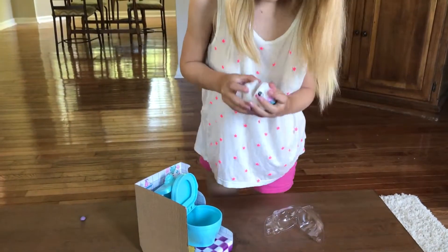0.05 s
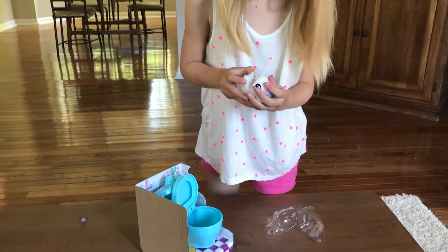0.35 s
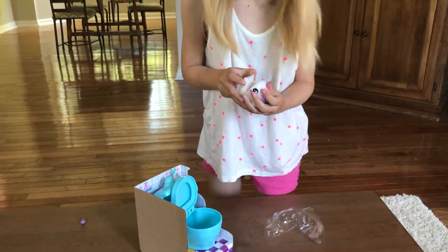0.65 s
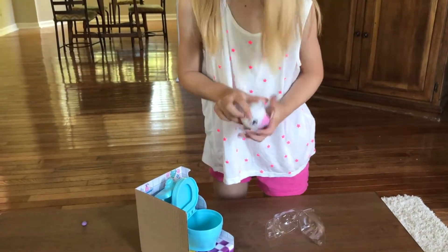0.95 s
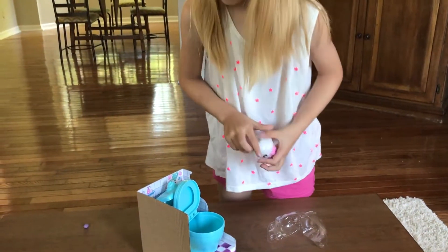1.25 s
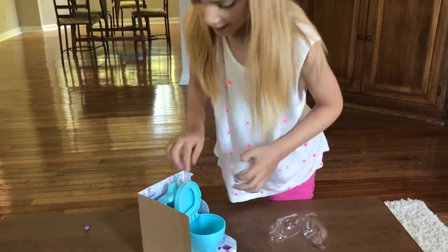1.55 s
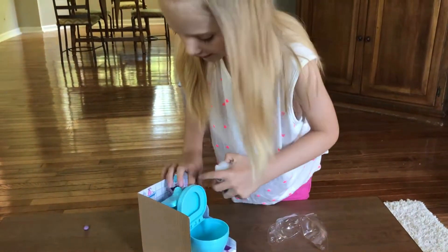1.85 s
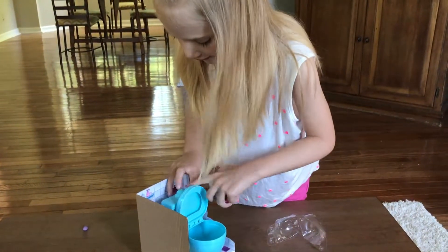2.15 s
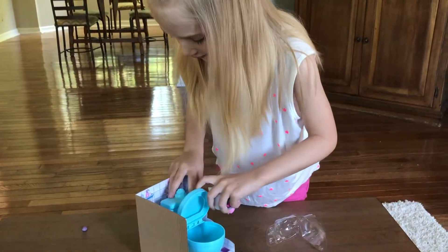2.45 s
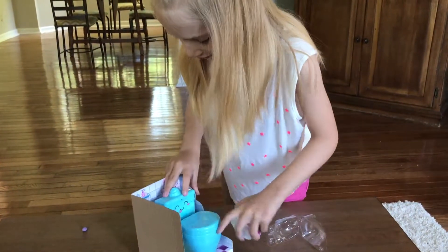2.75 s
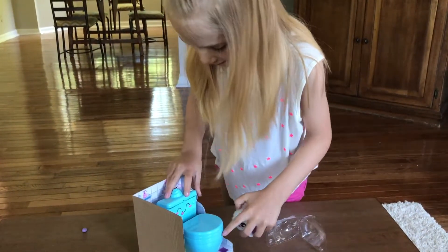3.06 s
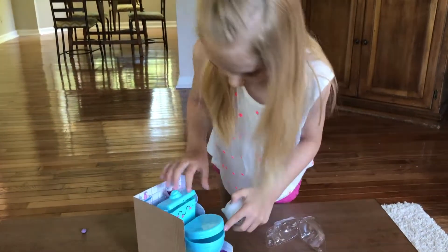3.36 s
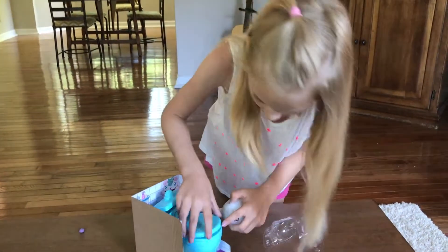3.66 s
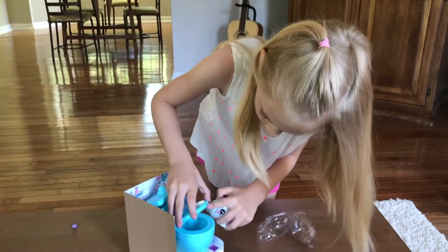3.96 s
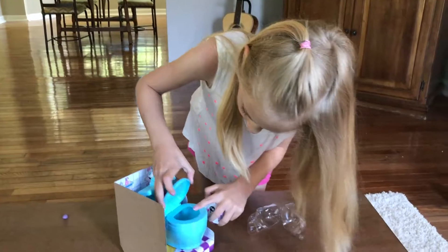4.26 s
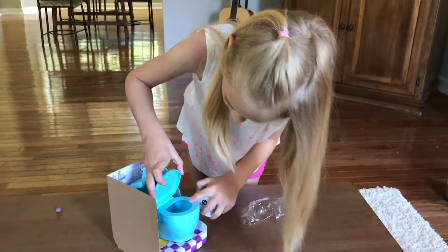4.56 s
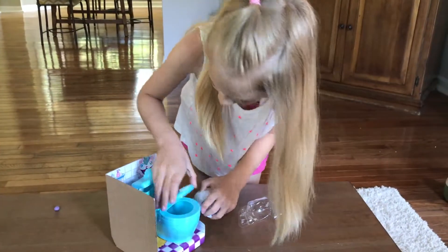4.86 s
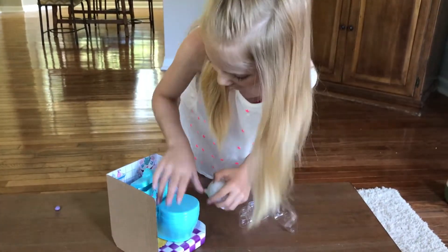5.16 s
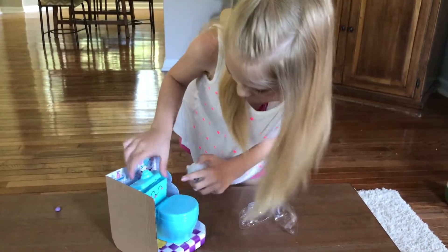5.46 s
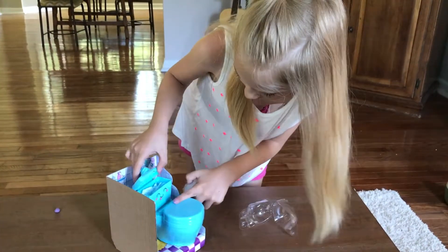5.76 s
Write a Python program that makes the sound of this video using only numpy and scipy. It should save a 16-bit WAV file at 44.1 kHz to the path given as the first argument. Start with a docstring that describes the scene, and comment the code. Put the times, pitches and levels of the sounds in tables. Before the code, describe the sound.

A small plastic toy with a hinged lid is handled on a table near the microphone. Light rubbing and taps lead to two sharp plastic clacks about a second apart, the first the loudest. The hinge creaks faintly, then the lid is pressed down with a hollow knock, followed by smaller taps and soft cardboard thumps. The room rings briefly after each hit, over still air and a low appliance hum.

```python
"""Plastic toy in its box

A quiet, wood-floored room, one microphone near a table. On it a hollow plastic toy with a hinged lid and
seat stands in its cardboard box. Fingers rub and bump it; the lid rattles and slaps shut, the seat drops,
the hinge creaks, and the lid is pressed home with a knock through bowl and box. Each blow cracks in the
thin walls and rings the part it hits; the room answers briefly, over still air and a faint hum."""
import sys
import numpy as np
from scipy import signal
from scipy.fft import rfft, irfft, next_fast_len
from scipy.io import wavfile
from scipy.ndimage import map_coordinates

SR = 44100
rng = np.random.default_rng(int(sys.argv[2]) if len(sys.argv) > 2 else 0)


def wrap_up_sound(samples):
    """Save the sound to the file named by the first command line argument, as 16-bit audio."""
    columns = np.atleast_2d(samples).T
    # keep every value between -1 and 1, then stretch to whole-number steps
    tamed = np.clip(columns, -1, 1)
    steps = np.round(tamed * 32767).astype(np.int16)
    wavfile.write(sys.argv[1], SR, steps)


N = 261072
BLOW_SAMPLES = 8192
T, HZ = np.arange(BLOW_SAMPLES) / SR, np.fft.rfftfreq(BLOW_SAMPLES, 1 / SR)  # axes of one blow

# Slow decay of the room: frequency_hz, t60_s
ROOM_DECAY = [(150, 1.35), (400, .5), (1000, 0.78), (3000, 0.61), (8000, 0.72), (15000, .5)]
# Colour of the room's answer: frequency_hz, gain_db
ROOM_COLOUR = [(120, -8), (300, 0.5), (520, -2.5), (1000, -1), (2500, -5.5), (4500, -8.5), (6500, -11.5),
               (9000, -10.5), (15000, -18.5)]
# Still air in the house: frequency_hz, relative_db
AIR_SPECTRUM = [(15, -37), (25, -13), (53, 5), (80, -9), (114, -3.5), (134, -7), (149, -25), (175, -7),
                (242, -17.5), (263, -13), (373, -16), (575, -23), (911, -24), (1370, -31), (16000, -45)]
# Household appliances: pitch_hz, level_db
HUM_TONES = [(51, -78.5), (120, -77), (239, -77), (905, -88)]
# The box pushed against the table: start_s, pitch_hz, peak_db
BOX_PUSHES = [(1.918, 264, -51.5), (2.022, 253, -55.5), (2.093, 230, -47.5), (4.778, 160, -47.5),
              (5.166, 150.5, -45.5), (5.513, 146, -53), (5.698, 310, -48)]
# Fingers on plastic and cardboard: middle_s, length_s, strength_db
FINGER_STROKES = [(1.04, 0.09, -80), (1.472, 0.11, -74), (1.867, 0.079, -63.5), (2.043, 0.073, -69),
                  (2.154, 0.1, -74), (2.264, .05, -66), (2.706, .056, -58.5), (3.103, 0.14, -70),
                  (3.303, 0.045, -67.5), (3.679, 0.033, -64.5), (4.06, 0.2, -69), (5.04, .043, -72),
                  (5.593, 0.2, -71), (5.907, 0.13, -68)]
# The low scrape and high hiss of rubbing: frequency_hz, relative_db
SCRAPE_SPECTRUM = [(150, -25.5), (500, -2.5), (1000, 2), (1700, -2), (2300, -5), (2900, -7.5), (3700, -8),
                   (4800, -20.5), (9000, -57.5)]
HISS_SPECTRUM = [(800, -48), (2200, -3), (3300, -7), (5500, 1), (8000, -5), (15500, -5.5)]
# A dragging fingertip makes the bowl sing: middle_s, length_s, pitch_hz, level_db
FINGER_SQUEAKS = [(1.868, 0.047, 1040, -66.5), (1.869, 0.024, 678, -66.5), (5.607, 0.046, 1038, -62),
                  (5.907, 0.031, 1040, -63.5)]
# Dense, quickly damped vibration of the thin walls: frequency_hz, relative_db
WALL_SPECTRUM = [(80, -38.5), (185, -21.5), (260, -2), (400, -3.5), (520, -8.5), (720, -4.5), (1020, 2),
                 (1580, -4), (2000, -4.5), (3900, -1), (4700, -5), (6200, -3), (10500, -5), (14000, 0)]
# Resonances of each part: pitch_hz, width_hz, relative_db
LID_MODES = [(291, 15, 2), (400, 56, 0), (722, 70, -8.5), (985, 34, -0.5), (1866, 32, -3), (1934, 23, 1),
             (2220, 30, -2.5), (2770, 130, -1.5), (3660, 110, -2.5), (3900, 62, -2.5), (5340, 26, -6),
             (5766, 50, -4.5), (6200, 91, -3.5), (6820, 44, -4), (8460, 34, -4.5), (8760, 120, -7.5),
             (9600, 60, -3), (13450, 140, -3.5)]
SEAT_MODES = [(686.5, 84, 1), (900, 73, 1), (1263, 59, 2.5), (1980, 43.15, -7.5), (2247, 41, 0.5),
              (2760, 37, 5), (3260, 33, 3), (4340, 43, -4.5), (4530, 210, 2), (5640, 110, -8),
              (5880, 130, -0.5), (7200, 79, -7), (8520, 70, 1.5), (9200, 110, 5), (13600, 80, 0.5)]
BOWL_MODES = [(296, 45, -1), (389.6, 120, -0.5), (686, 180, -2.5), (990.6, 80, -2.5), (1370, 68, -2.5),
              (1790, 40, -5.5), (2283, 30, -4), (2717, 49, -2.5), (3570, 37, -48), (4620, 64, -14),
              (6360, 190, -3), (8600, 300, -3.5)]
# Contacts with each part: start_s, panel_hz, level_db, hardness_hz, weight_db
# Treble falls above the hardness: low for a fingertip, high for plastic on plastic.
# Weight is the bass: little in a loose rattle, much in a push that reaches the table.
LID_CONTACTS = [(2.677, 850, -53, 2905, -19.5), (2.6897, 716, -44, 2600, -15),
                (2.7195, 780, -47, 4000, -18), (2.729, 2936, -41, 3000, -18.5),
                (2.7418, 270, -16, 21990, -6)]
SEAT_CONTACTS = [(3.3965, 2310, -63, 2770, 6), (3.633, 2150, -58, 2000, 10), (3.6612, 895, -52.5, 3380, 12),
                 (3.7048, 2180, -45, 2900, -22), (3.7113, 704, -25, 15000, -7),
                 (4.2535, 1402, -54.5, 2610, -13), (4.768, 2240, -52, 2860, 8.5),
                 (4.859, 1410, -61.5, 2000, -9), (4.8865, 3530, -64, 7000, -10),
                 (4.974, 1570, -57, 2900, -24)]
BOWL_CONTACTS = [(.7905, 2120, -69.5, 14000, 7), (1.727, 1370, -67.5, 4800, -13),
                 (1.8305, 3650, -54.5, 3400, -27), (1.9105, 2270, -49, 2370, -12),
                 (2.0932, 678, -48, 1733, -13), (2.141, 845, -64.5, 5400, -11),
                 (5.081, 1465, -54.5, 3000, -19), (5.085, 1464, -36, 12000, 6),
                 (5.1585, 1020, -47, 1100, -4.5), (5.2283, 1890, -44, 5940, 2),
                 (5.3232, 2400, -56.5, 3620, -7), (5.5955, 1430, -53, 2445, 4.5),
                 (5.6065, 910, -53.5, 7800, -9), (5.624, 2630, -62, 2840, -20), (5.657, 1380, -60, 3500, 0),
                 (5.6985, 1357, -49.5, 6000, 3.5)]


def amp(db):
    """Decibels to gain."""
    return 10 ** (np.asarray(db) / 20)


def unit(x):
    """x at rms 1."""
    return x / np.sqrt(np.mean(x ** 2) + 1e-30)


def along(points, hz):
    """A curve read on a log frequency axis."""
    frequencies, values = np.transpose(points)
    return np.interp(np.log(hz + 1), np.log(frequencies + 1), values)


def filtered(x, gain):
    """x times a gain that depends on frequency."""
    size = next_fast_len(N + BLOW_SAMPLES)
    return irfft(rfft(x, size) * gain(np.fft.rfftfreq(size, 1 / SR)), size)[:N]


def coloured(x, spectrum):
    """x shaped by a spectrum table, at rms 1."""
    return unit(filtered(x, lambda hz: amp(along(spectrum, hz))))


def causal(db):
    """The response with these gains that never sounds before its cause."""
    cepstrum, half = irfft(np.log(amp(db))), BLOW_SAMPLES // 2
    return np.exp(rfft(cepstrum * np.r_[1, np.full(half - 1, 2), np.zeros(half)]))


def smoothed(power, spread):
    """Mean of a power spectrum over a share of each frequency to either side."""
    total, reach = np.cumsum(power), spread * HZ + 2 * HZ[1]
    return (np.interp(HZ + reach, HZ, total) - np.interp(HZ - reach, HZ, total)) * HZ[1] / (2 * reach)


def add(track, start_s, x):
    """Mix x into the track."""
    part = track[max(round(start_s * SR), 0):][:len(x)]
    part += x[:len(part)]


def house(air_db=-64.5, waver_rad=0.98):
    """Room tone: still air and a faint, slightly unsteady appliance hum."""
    t = np.arange(N) / SR
    drift = lambda: map_coordinates(rng.standard_normal(32), [t * 4])
    hum = sum(np.sqrt(2) * amp(db) * np.sin(2 * np.pi * hz * t + waver_rad * drift())
              for hz, db in HUM_TONES)
    return hum + amp(air_db) * coloured(rng.standard_normal(N), AIR_SPECTRUM)


def room(early_t60=0.28, early_db=4, first_wall_s=.009):
    """A click's echoes at the microphone: near walls die fast, the open space behind more slowly."""
    hz, t, noise = signal.stft(rng.standard_normal(int(SR * .7)), SR, nperseg=256)
    decay = amp(-60 * t / along(ROOM_DECAY, hz)[:, None]) + amp(early_db - 60 * t / early_t60)
    decay /= np.sqrt(np.mean(decay ** 2, axis=1, keepdims=True))
    tail = signal.istft(noise * decay * amp(along(ROOM_COLOUR, hz))[:, None], SR, nperseg=256)[1]
    return np.r_[np.zeros(int(first_wall_s * SR)), tail / np.sqrt(len(tail))]


def fingers(catches_per_s=2500, smooth_share=0.65, scrape_db=-1, hiss_db=-5, squeak_width_hz=70):
    """Rubbing is a stream of tiny catches; one swell per stroke drives both its scrape and its hiss."""
    t = np.arange(N) / SR
    catches = unit((rng.random(N) < catches_per_s / SR) * rng.standard_normal(N))
    friction = catches + smooth_share * rng.standard_normal(N)
    swell = lambda middle, length: np.exp(-2 * ((t - middle) / length) ** 2)
    effort = sum(amp(db) * swell(s, length) for s, length, db in FINGER_STROKES)
    resonance = lambda pitch: lambda hz: 1 / (1 + (2 * (hz - pitch) / squeak_width_hz) ** 2)
    squeaks = sum(amp(db) * swell(s, length) * unit(filtered(friction, resonance(hz)))
                  for s, length, hz, db in FINGER_SQUEAKS)
    scrape = amp(scrape_db) * coloured(friction, SCRAPE_SPECTRUM)
    hiss = amp(hiss_db) * coloured(friction, HISS_SPECTRUM)
    rub = effort * (scrape + hiss) + squeaks
    return rub + signal.fftconvolve(rub, room())[:N]


def box(t60=0.044, rise_s=0.0022, wet_db=-2):
    """Each soft push swells into one low, quickly damped note of the cardboard."""
    track = np.zeros(N)
    swell = (1 - np.exp(-(T / rise_s) ** 2)) * amp(-60 * T / t60)
    for start_s, hz, db in BOX_PUSHES:
        add(track, start_s, amp(db) * swell / swell.max() * np.sin(2 * np.pi * hz * T))
    return track + amp(wet_db) * signal.fftconvolve(track, room())[:N]


def touch(hardness_hz, weight_db, fall_db_per_octave=11.5, whole_toy_hz=514):
    """Colour of a contact in dB: a soft one lacks treble, a heavy one moves the whole toy, adding bass."""
    treble = -10 * np.log10(1 + (HZ / hardness_hz) ** (fall_db_per_octave / (10 * np.log10(2))))
    return treble + weight_db / (1 + (HZ / whole_toy_hz) ** 4)


def snap(noise, t60):
    """Spectrum of a dying burst that, like a sharp contact, is even from bass to treble."""
    burst = rfft(noise * amp(-60 * T / t60))
    return burst * causal(-10 * np.log10(smoothed(np.abs(burst) ** 2, spread=.2) + 1e-9))


def blow(modes, panel_hz, colour_db, rise_s, crack_t60, ring_db, panel_db, sheen_db,
         panel_t60=.04, damping_hz=9000):
    """One contact: a crack of the thin walls, the ring of the part and the note of the touched panel."""
    onset = 1 - np.exp(-(T / rise_s) ** 2)
    noise = rng.standard_normal(BLOW_SAMPLES) * onset
    # plastic damps the highest vibrations twice as fast
    high = 1 / (1 + (damping_hz / (HZ + 1)) ** 4)
    burst = (1 - high) * snap(noise, crack_t60) + high * amp(sheen_db) * snap(noise, crack_t60 / 2)
    crack = irfft(burst * causal(along(WALL_SPECTRUM, HZ)))
    ring = np.zeros(BLOW_SAMPLES)
    for hz, width_hz, db in modes:
        scatter_db, phase = rng.standard_normal(2)
        decay = width_hz * np.exp(-np.pi * width_hz * T)
        ring += amp(db + scatter_db) * decay * np.sin(2 * np.pi * (hz * T + phase))
    panel = np.sin(2 * np.pi * panel_hz * T) * amp(-60 * T / panel_t60)
    spectrum = rfft(unit(crack) + amp(ring_db) * unit(ring * onset) + amp(panel_db) * unit(panel * onset))
    knock = unit(irfft(spectrum * causal(colour_db)))
    return knock * np.sqrt(.01 * SR / BLOW_SAMPLES)  # the energy of 10 ms at 0 dB


def radiated(x, even_share):
    """A blow as it leaves the toy in all directions: its peaks and notches partly even out."""
    power = np.abs(rfft(x)) ** 2
    evened = even_share * smoothed(power, spread=.21) + (1 - even_share) * power
    return irfft(causal(10 * np.log10(evened + 1e-14)))


def struck(contacts, modes, attack_s, wet_db, even_share, press_cycles=1.2, **timbre):
    """Blows on one part, each reaching the microphone directly and then by way of the room."""
    track = np.zeros(N)
    for start_s, panel_hz, db, hardness_hz, weight_db in contacts:
        rise_s = attack_s + press_cycles / hardness_hz  # a soft contact builds up more slowly
        direct = amp(db) * blow(modes, panel_hz, touch(hardness_hz, weight_db), rise_s, **timbre)
        add(track, start_s, direct)
        add(track, start_s, amp(wet_db) * signal.fftconvolve(radiated(direct, even_share), room()))
    return track


def loose_parts(start_s=1.75, end_s=4.6, count=10, tick_db=-76, spread_db=2.5,
                hardness_hz=7000, weight_db=-12):
    """Loose parts tick faintly at random moments while the toy is handled."""
    ticks = []
    for when, which, size in rng.random((count, 3)):
        panel_hz = SEAT_MODES[int(which * len(SEAT_MODES))][0]
        db = tick_db + spread_db * (2 * size - 1)
        ticks.append((start_s + (end_s - start_s) * when, panel_hz, db, hardness_hz, weight_db))
    return struck(ticks, SEAT_MODES, attack_s=0.0003, wet_db=-3.5, even_share=0.5,
                  crack_t60=0.017, ring_db=-8.5, panel_db=-13, sheen_db=-0.5)


def hinge(start_s=4.4847, first_gap_s=0.013, shortest_gap_s=0.0061, quicken=0.73, count=8,
          panel_hz=1607, slip_db=-66, hardness_hz=8000, weight_db=-12):
    """The tight hinge sticks and slips, faster and faster as the lid swings."""
    gaps = shortest_gap_s + (first_gap_s - shortest_gap_s) * quicken ** np.arange(count - 1)
    slips = [(s, panel_hz, slip_db, hardness_hz, weight_db) for s in start_s + np.r_[0, np.cumsum(gaps)]]
    return struck(slips, SEAT_MODES, attack_s=0.00027, wet_db=0.5, even_share=0.46,
                  crack_t60=0.022, ring_db=-10, panel_db=-11, sheen_db=-1.5)


def bowl():
    """The hollow bowl knocks as it is bumped and as the lid is pressed home."""
    return struck(BOWL_CONTACTS, BOWL_MODES, attack_s=0.00053, wet_db=-0.5, even_share=0.65,
                  crack_t60=0.035, ring_db=-3.5, panel_db=-6, sheen_db=-0.5)


def seat():
    """The seat drops with one hard clack among lighter touches."""
    return struck(SEAT_CONTACTS, SEAT_MODES, attack_s=0.00052, wet_db=-0.5, even_share=0.55,
                  crack_t60=0.03, ring_db=-6.5, panel_db=-13, sheen_db=2)


def lid():
    """The lid rattles, then slaps shut, plastic on plastic."""
    return struck(LID_CONTACTS, LID_MODES, attack_s=0.0005, wet_db=0, even_share=0.7,
                  crack_t60=0.042, ring_db=-5.5, panel_db=-18.5, sheen_db=6)


def scene():
    """The handled toy over the room tone, in mono at the microphone."""
    toy = lid() + seat() + bowl() + hinge()
    return (toy + box() + fingers() + house() + loose_parts())[None]


def record(dry, low_cut_hz=38, top_hz=16000):
    """The microphone drops the deepest bass and keeps nothing above its band limit."""
    bass = lambda hz: 1 - 1 / (1 + (hz / low_cut_hz) ** 4)
    top = lambda hz: 1 / np.sqrt(1 + (hz / top_hz) ** 240)
    return filtered(dry[0], lambda hz: bass(hz) * top(hz))[None]


dry = scene()
out = record(dry)
wrap_up_sound(out)
```